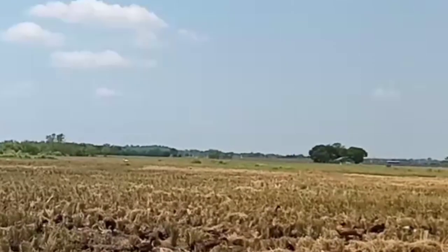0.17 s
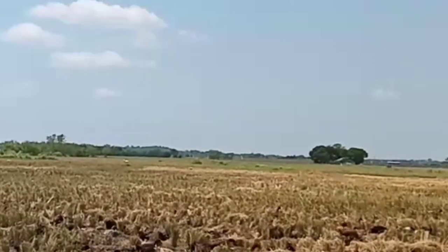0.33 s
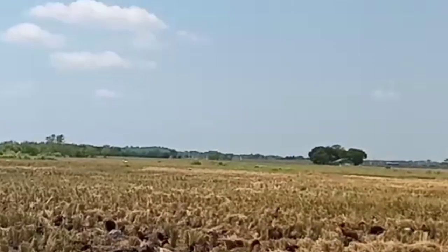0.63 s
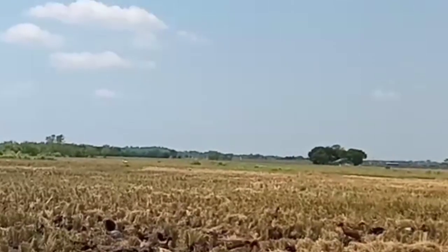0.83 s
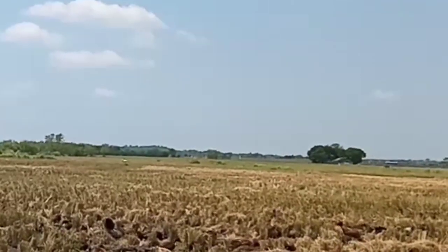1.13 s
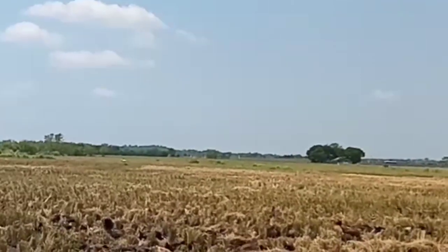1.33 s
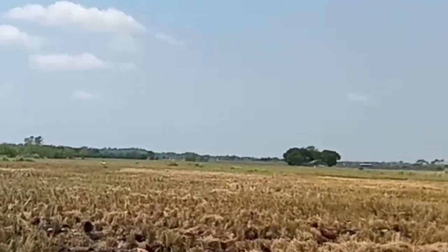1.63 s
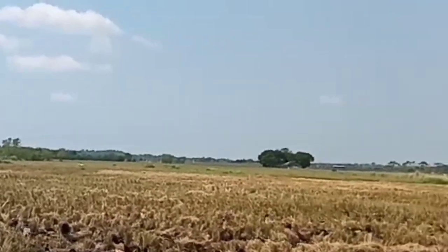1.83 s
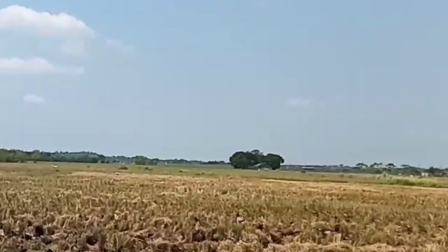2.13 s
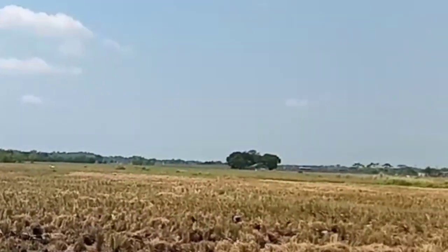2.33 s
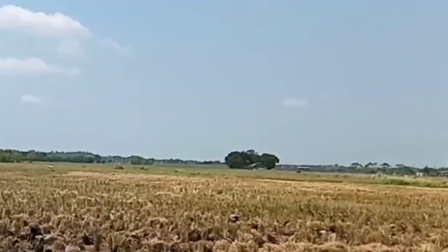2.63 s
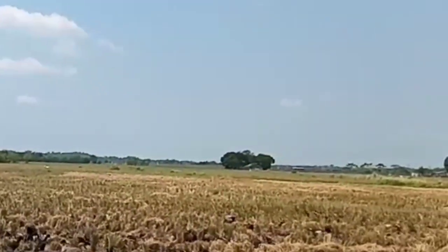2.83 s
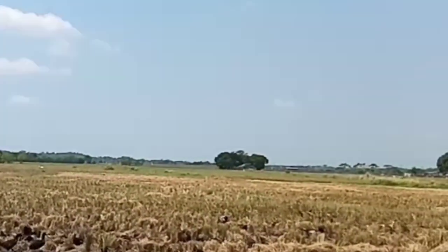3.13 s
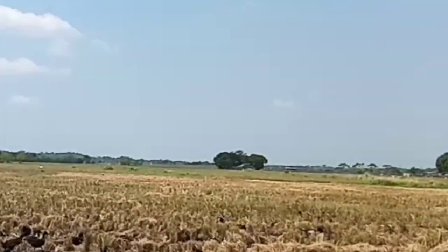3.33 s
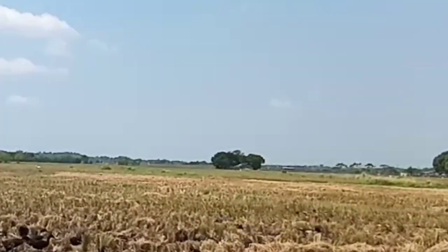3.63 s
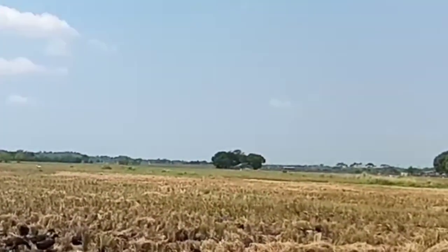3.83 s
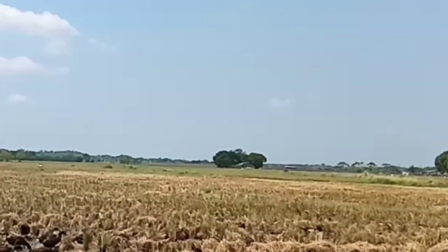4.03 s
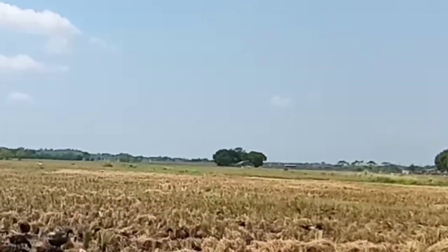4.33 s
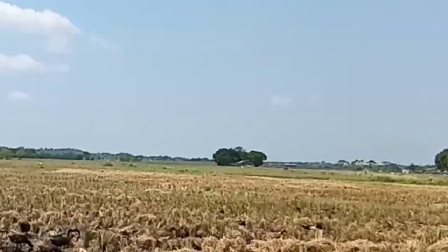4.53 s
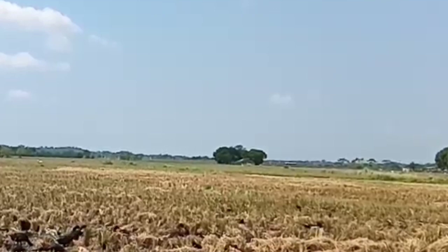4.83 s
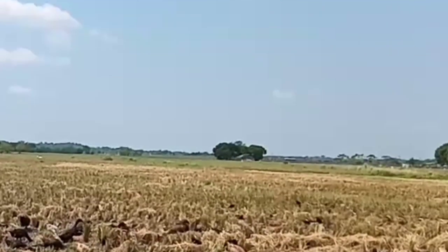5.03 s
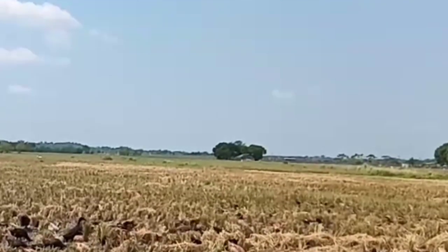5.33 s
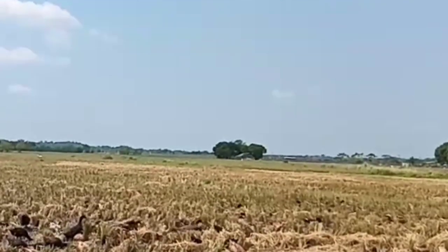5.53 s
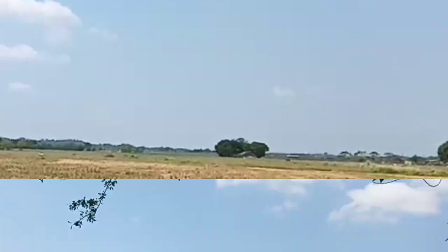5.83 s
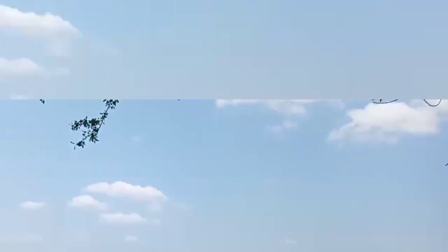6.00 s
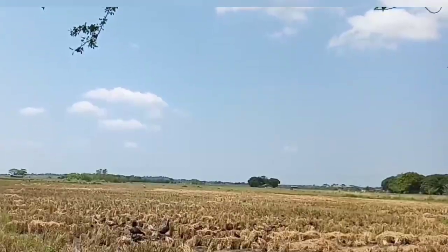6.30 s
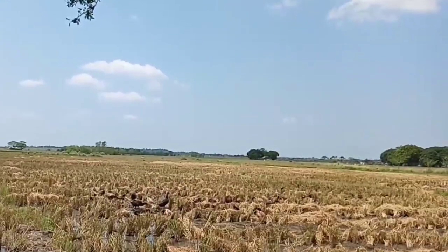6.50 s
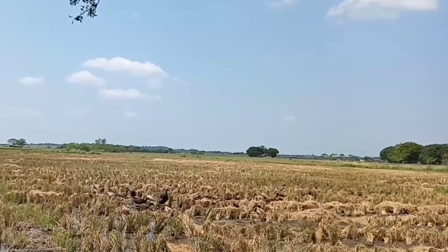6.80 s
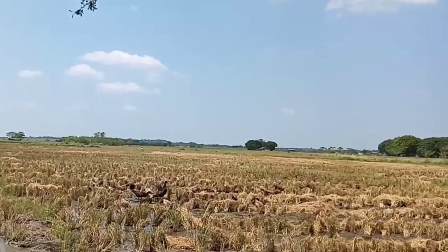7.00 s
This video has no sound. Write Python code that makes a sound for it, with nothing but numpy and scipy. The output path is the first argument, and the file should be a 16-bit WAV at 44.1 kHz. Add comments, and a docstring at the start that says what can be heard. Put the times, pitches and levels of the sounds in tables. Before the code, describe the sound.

Heavy, uneven wind rumble dominates, thudding against a small mono microphone. Beneath it a duck flock murmurs softly, with nearer birds giving quick clucks and warbling, slightly hoarse quacks that grow more frequent midway. Wet patter and small mud smacks run along, turning louder just after five seconds with crisp stalk snaps. Faint squeals from a far bird appear early and near the end, in dry open air.

```python
"""In a wet stubble field, a flock of ducks forages in gusty wind. Near birds quack and cluck, and a far
bird squeals, over the murmur of the rest; bills smack in the mud and dry stalks snap.
Calls excite throat and bill resonances with pulses and breath noise, or sum two partials for a squeal.
Smacks are ringing impulses, snaps are coloured impulses, and hiss and wind are shaped noise;
the strongest gusts buffet a small microphone as single low swings."""
import sys
import numpy as np
from scipy import signal
from scipy.fft import rfft, irfft
from scipy.io import wavfile
from scipy.ndimage import uniform_filter1d

SR = 44100
rng = np.random.default_rng(int(sys.argv[2]) if len(sys.argv) > 2 else 0)


def master_out(mix):
    """Clip the mix to full scale and print it as 16-bit PCM to the path in sys.argv[1]."""
    frames = np.transpose(np.atleast_2d(mix))
    ceiling = np.clip(frames, -1, 1)
    pcm = np.round(ceiling * 32767).astype(np.int16)
    wavfile.write(sys.argv[1], SR, pcm)


N = 315678  # length in samples


def gain_of(db):
    """Decibel law: an amplitude ratio is 10 to the power of dB / 20."""
    return 10 ** (np.asarray(db) / 20)


def evened(x):
    """Normalisation to unit root-mean-square amplitude."""
    return x / np.sqrt(np.mean(x ** 2) + 1e-20)


def curve(rows):
    """Linear interpolation of a (seconds, value) table at every sample."""
    seconds, value = np.transpose(rows)
    return np.interp(np.arange(N) / SR, seconds, value)


def add(mix, start_s, sound):
    """Superposition: a sound joins the mix at its start time."""
    part = mix[max(round(start_s * SR), 0):][:len(sound)]
    part += sound[:len(part)]


def resonate(x, hz, width):
    """Heterodyne resonance: shift hz to zero, smooth twice for steep skirts, and shift back."""
    turn = np.exp(2j * np.pi * np.cumsum(hz * np.ones(len(x))) / SR)
    pole = np.exp(-np.pi * width / SR)
    smoothed = signal.lfilter([(1 - pole) ** 2], [1, -2 * pole, pole * pole], x / turn)
    return 2 * (turn * smoothed).real


def coloured(x, points):
    """Spectral shaping: weight x by a (Hz, dB) table, interpolated over log frequency."""
    hz = np.fft.rfftfreq(len(x), 1 / SR)
    point_hz, point_db = np.transpose(points)
    weight_db = np.interp(np.log(hz + 1), np.log(point_hz + 1), point_db)
    return irfft(rfft(x) * gain_of(weight_db), len(x))


def lumps(seconds):
    """Slow random modulation: twice-averaged noise of rms 1 over the whole scene."""
    size = max(round(seconds * SR), 2)
    return evened(uniform_filter1d(uniform_filter1d(rng.standard_normal(N), size), size))


def unsteady(length, seconds):
    """Random modulation over one call: averaged noise of rms 1."""
    return evened(uniform_filter1d(rng.standard_normal(length), size=round(seconds * SR)))


def patchy(x, patch_db, frames, bins):
    """Time-frequency modulation: smoothed random patches make x louder and quieter."""
    spectrum = signal.stft(x, nperseg=512, noverlap=384)[2]
    field = uniform_filter1d(rng.standard_normal(spectrum.shape), frames, 1)
    field = evened(uniform_filter1d(field, bins, 0))
    return signal.istft(spectrum * gain_of(patch_db * field), nperseg=512, noverlap=384)[1][:N]


def arch(length, top):
    """Quarter-sine envelope: a swell from 0 to 1 and back, and whether it is still rising."""
    u = np.linspace(0, 1, round(length * SR))
    top = np.clip(top, .02, .98)
    rising = u < top
    return np.sin(np.pi / 2 * np.where(rising, u / top, (1 - u) / (1 - top))), rising


def distant(x):
    """Low-pass loss over distance: calls across the field keep little above the bill resonances."""
    return signal.sosfilt(signal.butter(4, 3600, fs=SR, output="sos"), x)


def voice(pitch_hz, rough, throat_hz, throat_width, upper, modes):
    """Source-filter principle: membrane pulses and breath puffs excite throat, upper and fixed resonances."""
    drift = evened(uniform_filter1d(rng.standard_normal(len(pitch_hz)), size=300))
    turns = np.cumsum(pitch_hz * (1 + .085 * rough * drift)) / SR + rng.random()
    pulses = sum(np.cos(2 * np.pi * k * turns) for k in range(1, 18))
    # breath noise jumps up at each cycle and then decays
    puffs = (0.9 + np.exp(-(turns % 1) / 0.9)) * rng.standard_normal(len(turns))
    drive = (1 - rough) * evened(pulses) + rough * evened(puffs)
    throat = resonate(drive, throat_hz, throat_width)
    upper_hz, upper_width, upper_db = upper
    high = gain_of(upper_db) * resonate(drive, upper_hz, upper_width)
    fixed = sum(gain_of(db) * resonate(drive, hz, width) for hz, width, db in modes)
    # the other resonances oppose the throat in sign
    return evened(throat - fixed - high)


ROUGH_FAR = .3  # share of breath noise in a far call
# The murmur of the far flock. Each row: time in seconds, rms level in dB.
MURMUR = [(0.0, -56.5), (0.46, -53.5), (1.69, -49), (2.79, -48.5), (3.0, -61.5), (3.49, -42), (3.97, -51),
          (4.42, -51.5), (5.36, -50), (6.28, -43.5), (7.16, -59.5)]


def flock(count=400):
    """Incoherent superposition: many dull calls at random moments blur into a murmur."""
    out = np.zeros(N)
    for when, size, throat, length, pitch, bend in rng.random((count, 6)):
        first_hz = 180 + 150 * pitch
        last_hz = first_hz * (.85 + .2 * bend)
        call = cluck(4 * size, 700 + 800 * throat, -30, .03 + .05 * length, first_hz, last_hz,
                     rough=ROUGH_FAR)
        add(out, when * N / SR, call * np.hanning(len(call)))
    return gain_of(curve(MURMUR)) * evened(distant(out))


# Colour of the field hiss. Each row: frequency in Hz, relative weight in dB.
HISS = [(210, -32), (350, -0.5), (561, -14.5), (730, 0), (823, -6.5), (1030, -3.5), (1410, -8),
        (1790, -11.5), (2940, -14.5), (3820, -18.5), (4810, -33), (6250, -61), (10600, -120)]
# Strength of the field hiss. Each row: time in seconds, rms level in dB.
HISS_LEVEL = [(0.0, -45.5), (0.88, -48), (1.9, -46.5), (2.43, -45.5), (3.2, -49.5), (3.71, -46.5),
              (5.4, -47), (5.65, -45), (6.78, -42.5), (7.16, -45.5)]


def hiss():
    """Broadband turbulence: wind in the stubble and far splashing, as slightly flickering shaped noise."""
    flicker_db = 2.2 * lumps(0.012) + 1.0 * lumps(0.041)
    noise = coloured(rng.standard_normal(N) * gain_of(flicker_db), HISS)
    return gain_of(curve(HISS_LEVEL)) * evened(patchy(noise, 2.23, frames=14, bins=7))


AIR_DB, AIR_FOLLOWS = -76.5, 0.99  # mean level before splashes; share of the field hiss changes in dB
SPLASH_S = .012  # time from the crest of a splash to 1/e of its lift in dB
# Colour of the fine air hiss. Each row: frequency in Hz, relative weight in dB.
AIR = [(4800, -30), (5500, -3), (6500, 0), (7200, -3), (8500, -1), (9300, -5), (9900, -13), (12000, -18),
       (15500, -19)]
# Brief splashes in the air hiss. Each row: crest time in seconds, lift in dB.
SPLASHES = [(.14, 4), (1.39, 12.5), (7.11, 5)]


def air():
    """High-frequency noise with Gaussian lifts: a faint treble hiss with a few splashes."""
    fine = coloured(rng.standard_normal(N) * gain_of(1.7 * lumps(0.0076)), AIR)
    t = np.arange(N) / SR
    change_db = curve(HISS_LEVEL) - curve(HISS_LEVEL).mean()
    lift_db = sum(db * np.exp(-((t - s) / SPLASH_S) ** 2) for s, db in SPLASHES)
    level_db = AIR_DB + AIR_FOLLOWS * change_db + lift_db
    return gain_of(level_db) * evened(patchy(fine, 1.1, frames=12, bins=12))


# Colour of the wind on the microphone. Each row: frequency in Hz, relative weight in dB.
WIND = [(12, -62), (20, -30.5), (76, -0.5), (118, 3), (168, -1), (252, -9), (538, -29.5), (650, -41),
        (840, -56), (1430, -120)]
# Strength of the eddies. Each row: time in seconds, level in dB.
GUSTS = [(0.0, -25.5), (1.33, -29.5), (1.44, -26), (1.95, -32.5), (2.49, -33), (2.63, -24.5), (2.71, -39.5),
         (2.75, -27.5), (2.91, -24.5), (2.95, -32), (3.09, -27), (3.27, -27.5), (3.31, -20), (3.47, -27),
         (3.6, -25), (4.13, -27), (4.69, -23), (4.73, -30), (5.0, -31), (5.06, -25), (5.14, -29),
         (5.96, -25), (6.12, -19.5), (6.16, -26.5), (6.94, -29.5), (6.98, -35), (7.16, -31.5)]
# Single buffets. Each row: start in seconds, swing level in dB, frequency in Hz.
BUFFETS = [(0.0628, -13, 148), (0.3689, -14.5, 168), (0.4583, -15.5, 124), (0.7618, -15, 134),
           (1.3873, -11.5, 98), (1.448, -20, 146), (2.57, -20, 160), (2.629, -12, 164), (3.056, -8, 140),
           (3.087, -5.5, 119), (3.133, -12, 133), (3.2136, -13.5, 175), (3.289, -14.5, 172),
           (3.3116, -10, 166), (3.6205, -13, 147), (3.7615, -10.5, 125), (3.851, -15, 158),
           (3.9467, -12.5, 115), (4.0233, -9.5, 141), (4.449, -11, 183), (4.688, -14, 117),
           (5.1763, -16.5, 153), (5.329, -15.5, 160), (5.382, -23.5, 150), (6.101, -13.5, 180)]


def wind():
    """Turbulent pressure: eddies hit the microphone in lumps, small ones more unevenly, and buffets swing."""
    noise = rng.standard_normal(N)
    lump = np.minimum(lumps(0.0093) + 0.68 * lumps(.035), 2.5)
    large = evened(coloured(noise * gain_of(1.85 * lump), WIND))
    small = evened(coloured(noise * gain_of(3.58 * lump), WIND))
    # large eddies supply the band below about 150 Hz, small ones the rest
    split = signal.butter(2, 150, fs=SR, output="sos")
    eddies = signal.sosfiltfilt(split, large - small) + small
    out = gain_of(curve(GUSTS)) * evened(eddies)
    for (s, db, hz), sign in zip(BUFFETS, rng.choice([-1., 1.], len(BUFFETS))):
        turns = np.arange(round(2.4 * SR / hz)) * hz / SR
        swing = np.sin(2 * np.pi * turns) + 0.16 * np.sin(4 * np.pi * turns)
        add(out, s, sign * gain_of(db) * swing * np.hanning(len(turns)) ** 1.4)
    return out


CRACKLE_PER_S, CRACKLE_DB = 45, -68  # small snaps: mean rate, and least level before colouring
# Loud snaps of dry stalks. Each row: time in seconds, impulse level in dB before colouring.
SNAPS = [(2.3471, -55), (3.6496, -48), (3.684, -52), (4.9492, -52), (5.1173, -60), (5.1537, -47),
         (5.244, -62), (5.3098, -48), (5.474, -52), (5.5286, -45), (5.5454, -57), (6.2377, -48),
         (6.667, -50)]
# Colour of a snap. Each row: frequency in Hz, gain in dB.
SNAP = [(1200, -18), (3000, 25), (4400, 21), (5400, 12), (9000, 9), (10500, -33)]


def stalks():
    """Impulsive fracture: dry stalks snap as coloured impulses, loud ones over a random crackle."""
    size_db = CRACKLE_DB + 4. * np.minimum(rng.exponential(1, N), 3)
    clicks = gain_of(size_db) * (rng.random(N) < CRACKLE_PER_S / SR)
    for s, db in SNAPS:
        add(clicks, s, gain_of([db]))
    return coloured(clicks, SNAP)


RASP_DB, ROUGH_CLUCK = 1.3, .27  # rms unevenness of breath in clucks and quacks; breath share of a cluck
# Short clucks. Each row: start in seconds, peak level in dB before distance loss and echo, mid-call throat
# resonance in Hz, upper resonance in dB, length in seconds, first and last pitch in Hz before a small arch.
CLUCKS = [(0.005, -33.5, 1050, -9, 0.028, 230, 207), (0.035, -40, 1000, -27, 0.069, 257, 230),
          (0.189, -41, 764, -31, 0.063, 257.4, 242), (0.243, -35.5, 900, -24, 0.017, 218, 200),
          (0.776, -35.5, 1180, -32, 0.04, 221.4, 197), (0.997, -34.5, 1640, -20, 0.026, 187, 169),
          (1.017, -32.5, 1220, -23, 0.05, 267.5, 250), (1.082, -36.5, 1610, -23, 0.039, 242.4, 188),
          (1.137, -34.5, 1320, -16, 0.035, 269, 239), (1.17, -35, 1000, -24, 0.1, 236, 220),
          (1.2, -31.5, 1350, -17, 0.044, 227.7, 216), (1.242, -29, 1040, -7, 0.048, 201.5, 213.6),
          (1.347, -28.5, 1300, -0.5, 0.056, 325, 301), (1.707, -35.5, 1630, -12, 0.037, 372, 330),
          (1.862, -29.5, 1320, -3, 0.047, 337, 295), (1.976, -34, 1420, -9, 0.052, 160, 178),
          (2.225, -28.5, 1740, -11, 0.042, 329, 307), (2.375, -27, 1650, -7, 0.052, 343, 302),
          (2.57, -37, 1370, -19, 0.091, 273, 245.6), (2.655, -34, 1040, -26, 0.036, 252, 253),
          (2.73, -32.5, 1660, -6, 0.048, 329, 306), (3.232, -37, 1280, -25, 0.022, 265, 250),
          (3.258, -29.5, 1480, 2, 0.058, 346, 287), (3.287, -33.5, 980, -26, 0.053, 247, 245),
          (3.636, -37.5, 1480, -24, 0.049, 290, 266), (3.703, -32, 1440, -20, 0.023, 283, 269),
          (3.727, -34, 1090, -33, 0.056, 261, 251), (3.786, -38, 1180, -36, 0.036, 236, 243),
          (3.838, -28, 1170, -3, 0.039, 266.4, 233), (3.937, -32, 1090, -24, 0.018, 227, 216),
          (3.997, -27.5, 1260, 2, 0.051, 326, 307), (4.279, -42, 1130, -14, 0.021, 224, 209),
          (4.328, -28, 1150, -0.5, 0.061, 240.7, 267), (4.488, -32, 1180, -8, 0.07, 218, 202),
          (4.684, -27.5, 1660, -3, 0.048, 329, 311), (5.118, -35, 900, -26, 0.018, 222, 200),
          (5.212, -34.5, 1010, -25, 0.048, 201, 194.6), (5.253, -33, 1040, -16, .045, 246, 255),
          (5.381, -32, 1180, -16, 0.035, 260, 247), (5.858, -30, 1150, -30, 0.044, 238.2, 202),
          (6.046, -34.5, 1060, -27, 0.066, 244.6, 243), (6.16, -36, 1430, -26, 0.06, 250.6, 222),
          (6.174, -31, 970, -22, 0.049, 198.6, 217), (6.272, -39, 800, -23, 0.085, 210.4, 186),
          (6.337, -33, 1160, -30, 0.033, 228, 207), (6.387, -35, 1290, -16, 0.031, 257.5, 250),
          (6.411, -34.5, 990, -39, 0.1, 255, 244), (6.734, -26, 1020, -33, 0.046, 259, 237),
          (6.782, -31.5, 1020, -36, 0.05, 244.7, 220), (7.039, -31, 1070, -14, 0.054, 216, 204.6),
          (7.084, -31, 1030, -21, 0.064, 249, 249)]


def cluck(db, throat_hz, upper_db, length, first_hz, last_hz, rough=ROUGH_CLUCK):
    """Moving formants: as the bill opens, the throat resonance rises and upper ones come in."""
    u = np.linspace(0, 1, round(np.clip(length, .015, .3) * SR))
    opening_db = upper_db - 18 * (1 - np.minimum(u / 0.35, 1))
    rise = 0.21 * np.clip(1.5 + upper_db / 22, 0, 1) * (u - .5)
    pitch_hz = (first_hz + (last_hz - first_hz) * u) * (.96 + 0.0499 * np.sin(np.pi * u))
    sound = voice(pitch_hz, rough, throat_hz * (1 + rise), 330, (2350, 520, opening_db),
                  [(throat_hz + 430, 380, opening_db + 4.5)])
    onset = np.minimum(u * length / 0.00083, 1)
    release = np.minimum((1 - u) / 0.25, 1)
    sound = sound * onset * release * gain_of(RASP_DB * unsteady(len(u), 0.0055))
    return gain_of(db) * sound / abs(sound).max()


def smack(hz, t60=0.028):
    """Damped resonance: a sharp knock and its decaying spray ring broadly, with a thin bright edge."""
    t = np.arange(900) / SR
    spray = rng.standard_normal(len(t)) * gain_of(-60 * t / t60) * 0.23
    spray[0] = 3.2  # the knock
    ring = resonate(spray, hz, 430) - gain_of(-12.5) * resonate(spray, 1.288 * hz, 900)
    ring = ring + gain_of(-40.5) * resonate(spray, 5500, 2500)
    return ring / abs(ring).max()


# Bills smacking in the mud. Each row: start in seconds, peak level in dB, ring in Hz.
SMACKS = [(0.023, -40, 3240), (0.043, -34.5, 1800), (0.1046, -38, 2200), (0.122, -37, 3050),
          (0.13, -32, 2870), (0.2736, -37, 2820), (0.408, -41, 2860), (0.438, -40, 2950), (0.49, -37, 2050),
          (0.539, -41, 2400), (0.742, -42, 2180), (0.085, -42, 2800), (0.826, -38, 3020),
          (0.902, -37.5, 2940), (1.387, -39.5, 3380), (2.17, -40, 2500), (2.601, -36.5, 2540),
          (3.2317, -32.5, 1920), (3.554, -39, 2950), (3.726, -36, 2900), (3.9, -39, 1420),
          (4.188, -39, 2700), (4.434, -36, 1900), (4.45, -33.5, 1980), (4.558, -38.5, 2600),
          (4.662, -37.5, 2700), (5.0118, -34, 3200), (5.016, -28.5, 3060), (5.0846, -23, 2380),
          (5.1522, -38, 2230), (5.2457, -36, 3100), (5.474, -36.5, 3000), (5.5851, -26, 2830),
          (5.625, -41, 2200)]
# Dry, wide ticks. Each row: start in seconds, peak level in dB.
TICKS = [(5.6425, -28.5), (6.921, -36)]


def mud():
    """Impulse excitation: loud smacks and a random patter of small ones in the mud. Two sharp, wide ticks of
    two samples, not part of the mud sounds, are also played here."""
    out = np.zeros(N)
    for s, db, hz in SMACKS:
        add(out, s, gain_of(db) * smack(hz))
    # each ring frequency patters 6 times a second on average
    for hz in np.geomspace(1900, 3800, num=10):
        size_db = -53.5 - 6.7 * np.log2(hz / 2000) + 5.3 * np.minimum(rng.exponential(1, N), 2.4)
        knocks = gain_of(size_db) * (rng.random(N) < 6 / SR)
        out += signal.oaconvolve(knocks, smack(hz))[:N]
    for s, db in TICKS:
        add(out, s, gain_of(db) * np.array([1., .3]))
    return out


FLUTTER_DB = 2.  # rms unevenness of a squeal
# Arched squeals of a far bird. Each row: start in seconds, length in seconds, share of the length at the top,
# first, top and last pitch in Hz, third and fourth partial in dB before distance loss and flutter.
SQUEALS = [ (.318, .11, .38, 440, 548, 475, -50, -52.5), (.452, .035, .05, 480, 480, 350, -51, -64),
           (4.6, .06, .05, 545, 545, 520, -51, -58), (6.15, .19, .38, 505, 600, 485, -57, -51.5),
           (6.38, .045, .2, 545, 555, 490, -48, -62), (6.62, .09, .05, 550, 550, 335, -43, -64),
           (6.675, .065, .45, 510, 552, 490, -49, -49), (7.06, .1, .8, 550, 597, 590, -62, -54), ]


def squeal(start, length, top, first_hz, top_hz, last_hz, third_db, fourth_db):
    """Additive synthesis: a thin, clean, arched call of which only two partials carry this far."""
    bend, rising = arch(length, top)
    pitch_hz = top_hz + (1 - bend) * (np.where(rising, first_hz, last_hz) - top_hz)
    angle = 2 * np.pi * np.cumsum(pitch_hz) / SR
    tone = gain_of(third_db) * np.sin(3 * angle) + gain_of(fourth_db) * np.sin(4 * angle)
    flutter = gain_of(FLUTTER_DB * unsteady(len(bend), 0.009))
    return start, tone * flutter * signal.windows.tukey(len(bend), .3)


RISE_DB, FADE_DB, CUT_S = -4.5, -5, 0.014  # level change at the start and end of effort; final drop in s
THROAT_SHUT, THROAT_SAG = 0.19, 0.025  # shares by which the throat is lower at the start and end
WARBLE_DB = 52  # level gained per unit of warble
ROUGH_TOP, ROUGH_WEAK = .2, .45  # share of breath noise at full effort and at none
# Bill resonance that stays put while the throat moves. Each row: frequency in Hz, width in Hz, level in dB.
BILL = [(2420, 1100, -25)]
# Long quacks. Each row: start in seconds, length in seconds, share of the length at the peak, rms level at the
# peak in dB before distance loss, warble and rasp, first, top and last pitch in Hz before warble, throat
# resonance at the peak in Hz, warble rate per second, warble depth as a share, time of one warble crest in
# seconds, chest resonance in dB, nasal resonance in dB.
QUACKS = [ (0.547, 0.23, 0.33, -46, 225.7, 212.7, 195.6, 1330, 17.3, 0.038, 0.65, -14, -19),
          (1.472, 0.24, 0.59, -39.5, 222.4, 250, 194.4, 1495, 15.2, 0.014, 1.58, -16, -11),
          (2.163, 0.17, 0.78, -39, 206, 241.7, 193, 1530, 23, 0.014, 2.37, -23, -5),
          (2.748, 0.18, 0.84, -38.5, 194, 251, 239, 1440, 22, 0.016, 2.6, -24, -3.5),
          (2.881, 0.077, 0.45, -38.5, 233.7, 250.6, 212, 1530, 29, 0.036, 2.8, -22, -14),
          (3.419, 0.21, 0.68, -38.5, 174.9, 203.5, 181, 1500, 21, 0.068, 3.05, -10, -8),
          (3.947, 0.17, 0.39, -39.5, 199.2, 213.6, 194.5, 1470, 17.7, 0.043, 5.1, 3, -1.5),
          (4.051, 0.19, 0.62, -37.5, 192.6, 224.6, 167, 1480, 28, 0.032, 4.06, -5, -5.5),
          (4.635, .21, 0.8, -35.5, 172, 207.8, 182, 1500, 26.4, 0.02, 4.7, -21, -5.5),
          (5.148, 0.064, 0.27, -41, 340, 315.6, 298, 1630, 21, 0.014, 5.26, -19, -11),
          (5.463, 0.054, 0.48, -40, 180, 184, 173, 1420, 28, 0.016, 6.8, -18, -5),
          (5.513, 0.048, 0.34, -40, 191, 199.5, 185, 1410, 23, 0.02, 4.7, -3, -4),
          (5.641, .14, 0.031, -34, 196, 206.2, 205.6, 1380, 18.6, 0.019, 6, -23, -6.5),
          (6.85, 0.079, 0.83, -36, 171.6, 191.5, 191, 1420, 27, 0.02, 7.8, 1.5, -12), ]


def quack(start, length, top, db, first_hz, top_hz, last_hz, throat_hz, warble, depth, crest,
          chest_db, nasal_db):
    """Coupled modulation: level, pitch, throat and clearness of a warbling call follow one swell of effort."""
    effort, rising = arch(length, top)
    slack = 1 - effort
    t = np.arange(len(effort)) / SR
    swing = depth * np.cos(2 * np.pi * warble * (start + t - crest))
    pitch_hz = (top_hz + slack * (np.where(rising, first_hz, last_hz) - top_hz)) * (1 + swing)
    throat_hz = throat_hz * (1 - slack * np.where(rising, THROAT_SHUT, THROAT_SAG))
    rough = ROUGH_TOP + (ROUGH_WEAK - ROUGH_TOP) * slack
    sound = voice(pitch_hz, rough, throat_hz, 440, (1850, 280, nasal_db), [*BILL, (1005, 210, chest_db)])
    level_db = db + slack * np.where(rising, RISE_DB, FADE_DB) + WARBLE_DB * swing
    level_db = level_db + RASP_DB * unsteady(len(t), 0.0085)
    onset = np.minimum(t / 0.0041, 1)
    release = np.minimum(t[::-1] / CUT_S, 1)
    return start, gain_of(level_db) * sound * onset * release


def ducks():
    """Scattering: the single calls are joined by a short noise-like tail of echoes from stubble and water."""
    calls = np.zeros(N)
    for s, *call in CLUCKS:
        add(calls, s, cluck(*call))
    for row in SQUEALS:
        add(calls, *squeal(*row))
    for row in QUACKS:
        add(calls, *quack(*row))
    calls = distant(calls)
    t = np.arange(4000) / SR
    scatter = rng.standard_normal(len(t)) * gain_of(-60 * t / 0.076)  # falls 60 dB in 76 ms
    echoes = signal.oaconvolve(calls, scatter / np.linalg.norm(scatter))[:N]
    return calls + gain_of(-12) * echoes


def scene():
    """Linear superposition of all the sources on one channel."""
    return (flock() + hiss() + air() + wind() + stalks() + ducks() + mud())[None]


EDGE_HZ = 15500  # upper band limit


def record(dry):
    """Transducer limits: deep bass is lost, hard buffets saturate softly, and the band ends at the edge."""
    thinned = signal.sosfilt(signal.butter(2, 45, "high", fs=SR, output="sos"), dry)
    ceiling = 0.41
    rounded = ceiling * np.tanh(thinned / ceiling)
    band = signal.firwin(511, EDGE_HZ, window=("kaiser", 9), fs=SR)
    return signal.oaconvolve(rounded, band[None], "same")


dry = scene()
out = record(dry)
master_out(out)
```